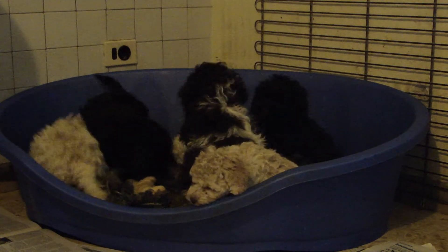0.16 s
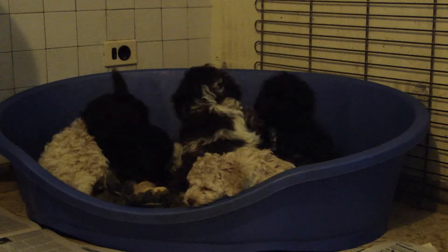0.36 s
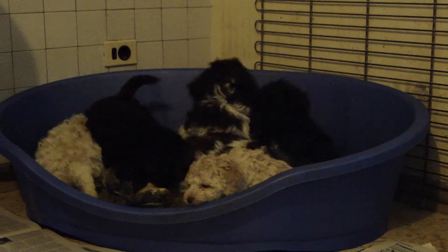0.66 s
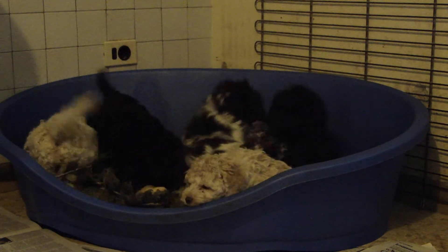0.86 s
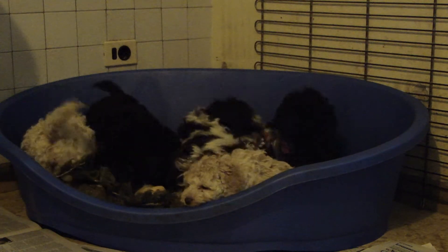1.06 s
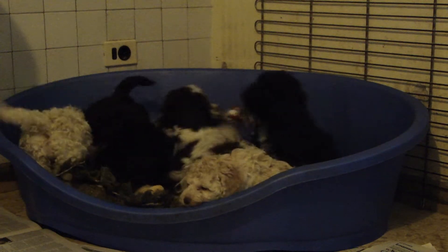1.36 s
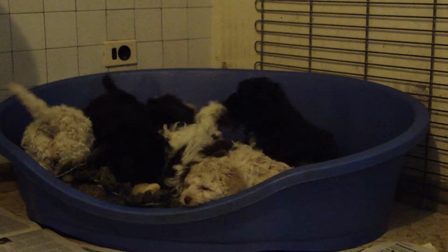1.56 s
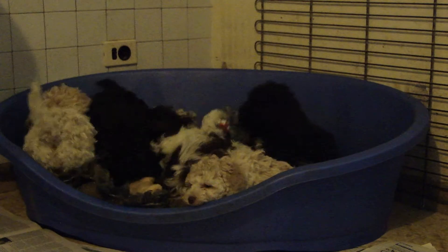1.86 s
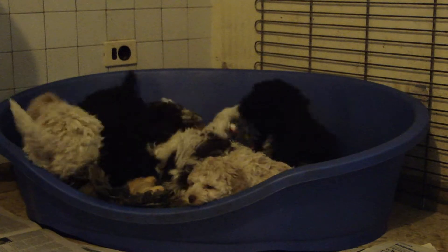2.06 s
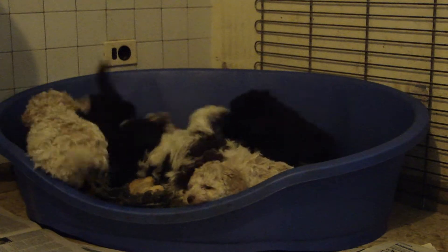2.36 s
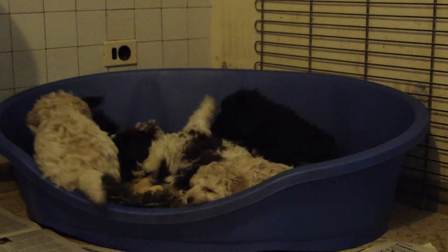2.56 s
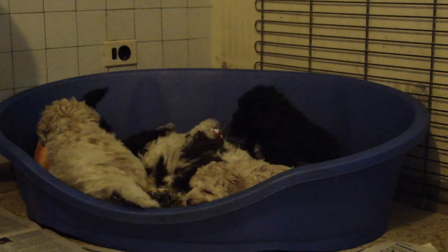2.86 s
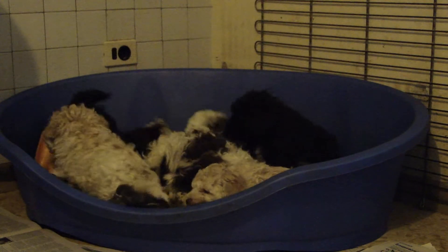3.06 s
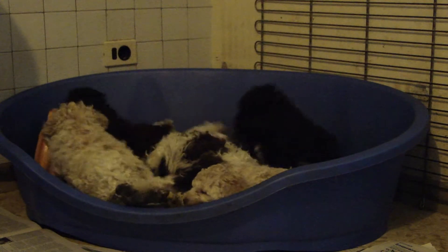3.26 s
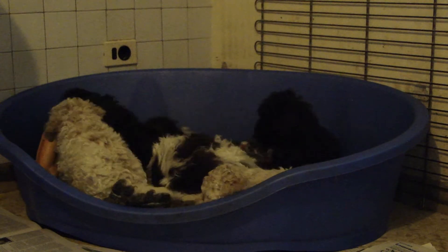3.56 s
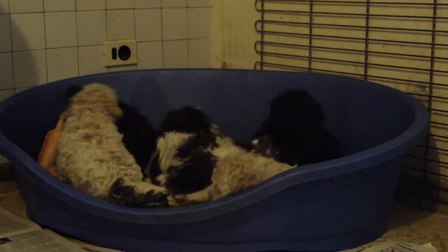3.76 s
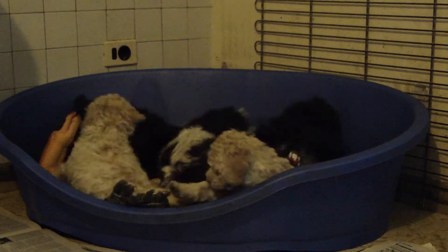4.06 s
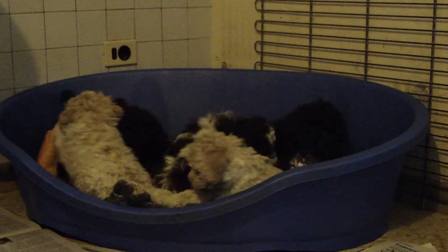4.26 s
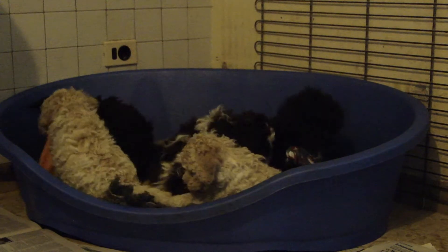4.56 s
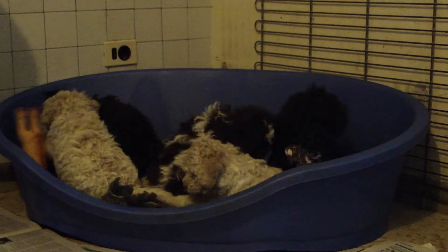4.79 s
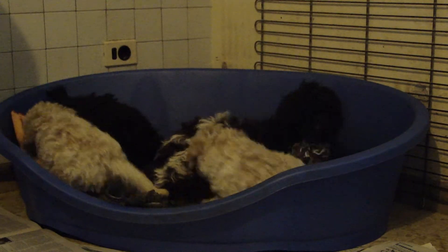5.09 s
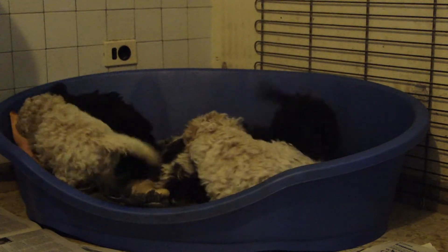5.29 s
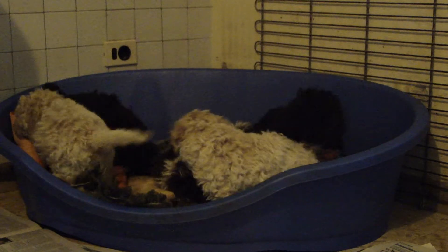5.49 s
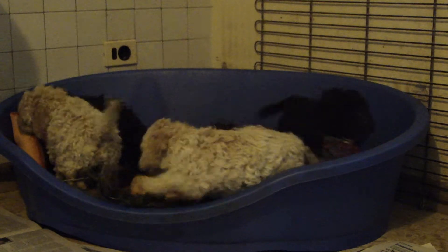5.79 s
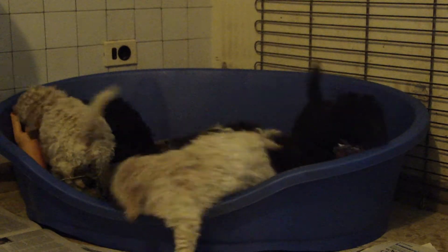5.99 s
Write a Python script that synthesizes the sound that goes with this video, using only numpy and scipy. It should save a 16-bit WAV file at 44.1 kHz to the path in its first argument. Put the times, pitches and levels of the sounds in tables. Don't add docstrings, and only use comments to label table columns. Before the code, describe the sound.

A small tiled room with a faint steady room tone and short reflections, heard closely in stereo, the bed slightly right. From 0 to 2.6 seconds puppies scuffle vigorously in a hollow plastic tub: paws judder on the wall in quick irregular strokes, drumming low, with raking claws, hard knocks, thumps, fur rustles and crisp claw ticks, notably at 0.8 and 1.9. A tiny peep hides at 0.25. Then the scrabbling stops abruptly. A faint rising squeal of a rubber toy at 2.8-3.0, soft shuffles and bumps at 3.1-3.4. A low soft growl swells from 3.5 to 4.0, with a chirping squeak at 3.85. Quiet until small thumps at 4.8; airy squeaks at 5.0, then a sharp knock and steep falling squeak at 5.15-5.28. A last low peep near 5.45, with light bright scuffs, rustles and dull bumps at 5.86 and 5.98 to the end.

```python
import sys
import numpy as np
from scipy import signal
from scipy.fft import rfft, irfft, next_fast_len
from scipy.io import wavfile
from scipy.ndimage import uniform_filter1d

SR = 44100
rng = np.random.default_rng(int(sys.argv[2]) if len(sys.argv) > 2 else 0)


def linear_from_db(decibels):
    return 10 ** (np.asarray(decibels, float) / 20)


def bounce(signal):
    frames = np.transpose(np.atleast_2d(signal))
    limited = np.clip(frames, -1, 1)
    pcm = np.round(limited * 32767).astype(np.int16)
    wavfile.write(sys.argv[1], SR, pcm)


N = 270505

# frequency [Hz], spectrum level [dB per Hz].
SCUFF_SPECTRUM = [(500, -40.5), (800, 1.5), (1300, 1.5), (2200, -1), (3500, -11), (5500, -25),
                  (9000, -57.5)]


def evened(x):
    return x / np.sqrt(np.mean(x ** 2) + 1e-20)


def read(points, hz):
    f, value = np.transpose(points)
    return np.interp(np.log(hz + 1), np.log(f + 1), value)


def colour(x, points):
    size = next_fast_len(x.shape[-1])
    gain = linear_from_db(read(points, np.fft.rfftfreq(size, 1 / SR)))
    return irfft(rfft(x, size) * gain, size)[..., :x.shape[-1]]


def body(x, modes):
    t = np.arange(6000) / SR
    ring = 0
    for k, (hz, width_hz, db) in enumerate(modes):
        decay = width_hz * np.exp(-np.pi * width_hz * t)
        ring = ring + (-1) ** k * linear_from_db(db) * decay * np.sin(2 * np.pi * hz * t)
    return signal.oaconvolve(x, ring)[:len(x)]


def slips(per_s, spread_db):
    hit, size = rng.random(N), rng.exponential(1, N)
    sign = rng.choice([-1., 1.], N)
    clicks = (hit < per_s / SR) * sign * linear_from_db(spread_db * np.minimum(size, 3))
    work = uniform_filter1d(clicks ** 2, size=700) + .1 * np.mean(clicks ** 2)
    return evened(clicks / np.sqrt(work))


def unit(filt, drive):
    return 1 / np.std(filt(drive[:SR]))


def strokes(rows, rise_s, land_db, land_s, sag_db, release_db_per_s):
    out, t = np.zeros((2, N + SR)), np.arange(SR // 3) / SR
    for start, length, db, rel_db in rows:
        shape_db = land_db * np.exp(-t / land_s) + sag_db * np.minimum(t / length, 1)
        shape_db -= release_db_per_s * np.maximum(t - length, 0)
        power = (np.minimum(t / rise_s, 1) * linear_from_db(shape_db)) ** 2
        out[:, round(start * SR):][:, :len(t)] += power * linear_from_db([[db], [db + rel_db]]) ** 2
    return out[:, :N]


def fidget():
    # time [s], drumming level [dB], claw scratch relative to it [dB].
    feet = [
        (0, -39.5, -9),
        (1, -40, -7.5),
        (2.4, -42.5, -12),
        (2.7, -59, 1.5),
        (3.35, -54.5, -4),
        (3.6, -59.5, 0.5),
        (4.5, -60, 1),
        (6.13, -56, 3),
    ]
    s, db, rel_db = np.transpose(feet)
    t = np.arange(N) / SR
    return linear_from_db([np.interp(t, s, db), np.interp(t, s, db + rel_db)]) ** 2


def tub():
    # start [s], length [s], drumming level [dB], claw scratch relative to it [dB].
    digs = [(0, 0.1132, -15, -11), (0.13, 0.0487, -30.5, -4), (0.28, 0.105, -24, -14),
            (0.372, 0.0974, -12.3, -9), (0.47, 0.0444, -28, -10), (0.68, 0.063, -28, -5.5),
            (0.74, 0.059, -39, 6.5), (0.793, 0.081, -16, -8), (0.893, 0.0668, -26, 2.5),
            (0.96, 0.092, -31.9, -5.5), (1.04, 0.112, -25.5, -14.5), (1.15, 0.1213, -17.5, -5),
            (1.26, 0.066, -24, -12.5), (1.355, 0.054, -39.5, -4.5), (1.42, 0.0287, -27.5, -15),
            (1.458, 0.06, -33.5, -7), (1.544, 0.0726, -17.5, -8.5), (1.61, 0.0788, -16.5, -10),
            (1.75, 0.072, -35.5, -12), (1.83, 0.14, -32, -10), (1.98, 0.0386, -12, -9.5),
            (2.03, 0.0764, -20.5, -6), (2.095, 0.0507, -18.5, -13), (2.14, 0.045, -39, -3.5),
            (2.2, 0.039, -29, -15), (2.266, 0.044, -35, -13.5), (2.317, 0.101, -32, -16),
            (2.432, 0.0603, -16.5, -8.5), (2.5, 0.098, -20.5, -8.5), (2.6, 0.1053, -34, -10.5)]
    # start [s], length [s], drumming level [dB], scratch relative to it [dB].
    shuffles = [(2.87, 0.0386, -43, -4), (3.05, 0.083, -41.5, -20), (3.145, 0.063, -33.5, -9),
                (3.21, 0.145, -45.5, -7), (3.372, 0.049, -38, -7), (3.99, 0.048, -47.5, 5),
                (4.07, 0.14, -59.5, 4), (4.545, 0.0337, -48, 5.5), (4.7, 0.116, -47, -2.5),
                (4.828, 0.0675, -29.8, -9), (4.9, 0.126, -44, -2), (5.09, 0.038, -50.5, -7.5),
                (5.155, 0.0935, -38, -3.5), (5.28, 0.064, -41.5, 1.5), (5.35, 0.0777, -54, 17.5),
                (5.42, 0.077, -54, 3.5), (5.516, 0.0505, -48, 17.5), (5.61, 0.0843, -44.5, 8),
                (5.75, 0.091, -44.5, 4), (5.862, 0.135, -38.5, -5.5), (5.985, 0.106, -39.5, -22),
                (6.083, 0.045, -38.5, 6.5)]
    # frequency [Hz], width [Hz], level [dB].
    wall = [(145.3, 8.1, -17), (208.9, 16.45, -7), (250, 24.9, 1), (286.6, 58.1, -2), (341.8, 35.15, 1.5),
            (401.9, 41.7, -1.5), (440.8, 40.4, -2.5), (544.8, 46.2, -0.5), (507.8, 46.4, -4.5),
            (600.2, 14.2, -2.5), (623, 65.4, -11.5), (682.8, 61.2, -7)]
    # frequency [Hz], width [Hz], level [dB].
    rim = [(739.2, 93, -1.5), (862.3, 51, -1.5), (990, 27, -9), (945.6, 77.6, -5.5), (1106, 165, -5),
           (1248, 64.7, -4), (1481.8, 63.3, -10), (1596, 64, -11), (1765.5, 265, -14), (2054, 194, -13.5),
           (2600, 640, -23.5)]
    # frequency [Hz], level [dB per Hz].
    scratch_spectrum = [(350, -32.5), (600, 9), (910, -20), (1000, -7.5), (1360, -14), (2400, -28),
                        (5000, -39), (6500, -73), (11000, -120)]

    def low(x):
        return body(x, wall)

    def high(x):
        return body(x, rim) + linear_from_db(38.0) * colour(x, scratch_spectrum)

    def thin(x):
        return colour(x, SCUFF_SPECTRUM)

    power = strokes(digs, rise_s=0.02, land_db=1, land_s=.02, sag_db=-7, release_db_per_s=600)
    power = power + strokes(shuffles, rise_s=.004, land_db=3, land_s=0.0466, sag_db=-6.5, release_db_per_s=399.5)
    drum, scratch = np.sqrt(power + fidget())
    pad, claws = slips(750, 3.5), slips(2500, 4.)
    light = scratch ** 2 / (scratch ** 2 + 1.95 * drum ** 2 + 1e-20)
    drummed = linear_from_db(-4) * unit(low, pad) * low(pad * drum)
    raked = linear_from_db(-1.64) * unit(high, claws) * high(claws * scratch * np.sqrt(1 - 0.87 * light))
    scuffed = linear_from_db(-0.5) * unit(thin, claws) * thin(claws * scratch * np.sqrt(light))
    return drummed + raked + scuffed


def jolts():
    # time [s], peak [dB], pitch [Hz].
    jerks = [(0.007, -15, 553), (0.028, -17, 350), (0.058, -16, 538.6), (0.088, -17, 290),
             (0.117, -22.0, 373.5), (0.143, -24.5, 279), (0.282, -27, 268), (0.304, -25.5, 268.5),
             (0.32, -29, 288), (0.34, -28, 382), (0.394, -14, 290.6), (0.415, -12, 303.4),
             (0.447, -14.5, 273), (0.483, -21.5, 318), (0.503, -20, 283), (0.694, -22, 277),
             (0.814, -15.5, 593), (0.835, -13, 297.3), (0.862, -18.0, 275), (0.901, -10.5, 280.5),
             (0.933, -21.5, 305), (0.968, -25, 262), (1.062, -22.5, 353.6), (1.181, -16.5, 259),
             (1.204, -13, 287), (1.247, -15, 297), (1.285, -21.5, 300.5), (1.304, -27.5, 283),
             (1.368, -28, 257.4), (1.56, -15, 663.5), (1.599, -17.5, 271), (1.637, -14, 289),
             (1.691, -23, 270), (1.922, -24.5, 564), (2.011, -13.5, 318), (2.026, -23.5, 317),
             (2.049, -18, 296.6), (2.082, -20, 373), (2.1, -20, 562.5), (2.113, -16, 290),
             (2.153, -26.5, 469), (2.172, -27, 274), (2.326, -27, 280), (2.455, -14.5, 279.7),
             (2.505, -17.5, 322.4), (2.519, -21, 357.6), (2.535, -20, 305), (2.565, -19, 262.5),
             (4.83, -27.5, 493.5), (4.852, -27, 575.6), (4.896, -34.5, 511), (4.926, -34.5, 499),
             (5.158, -21, 831), (5.199, -31.5, 505), (5.311, -35.5, 525.5), (5.531, -34, 1567),
             (5.551, -32.5, 805.5), (5.867, -29, 369), (5.991, -43.5, 332), (6.094, -31.5, 601)]
    lead_s, rise_s, t60_s = 0.005989, 0.00195, 0.0505
    out, t = np.zeros(N + 3000), np.arange(3000) / SR
    grit = evened(colour(rng.standard_normal(N + 3000), SCUFF_SPECTRUM))
    for (s, db, hz), near in zip(jerks, rng.random((len(jerks), 3))):
        at = round((s - lead_s) * SR)
        fade = linear_from_db(db + 4 - 60 * t / t60_s) * (1 - np.exp(-t / rise_s)) ** 2
        upper = sum(np.sin(2 * np.pi * (330 + 420 * k) * t) for k in near)
        swing = -np.sin(2 * np.pi * hz * t) - linear_from_db(-9.5) * upper + linear_from_db(-15) * grit[at:at + 3000]
        out[at:at + 3000] += fade * swing
    return out[:N]


def raps():
    # time [s], peak [dB], pitch [Hz].
    knocks = [(0.015, -20.5, 721), (0.032, -20, 714), (0.291, -35, 687), (0.356, -25, 616),
              (0.37, -19, 759), (0.386, -15, 1001), (0.419, -16, 675), (0.454, -21, 677), (0.478, -24, 708),
              (0.686, -27.5, 713), (0.736, -26, 1337), (0.801, -14.5, 690), (0.819, -16, 997),
              (0.897, -18.5, 789), (0.913, -23.5, 674), (0.957, -23.5, 1478), (1.056, -22, 694),
              (1.11, -32, 695), (1.151, -17.5, 727), (1.165, -18.5, 620), (1.184, -11.5, 675),
              (1.207, -11, 643), (1.229, -19, 857), (1.289, -25.5, 660), (1.359, -34.5, 689),
              (1.439, -35, 798), (1.458, -29.5, 680), (1.551, -18, 695), (1.574, -16.5, 653),
              (1.602, -16.5, 703), (1.625, -16, 737), (1.919, -26.5, 624), (1.984, -23.5, 744),
              (1.992, -14.5, 642), (2.053, -21, 693), (2.267, -39, 686), (2.318, -34, 689),
              (2.439, -19, 663), (2.454, -16.5, 656), (2.49, -22, 990), (2.509, -17.5, 667),
              (3.146, -32, 990), (3.37, -35, 1194), (3.996, -34.5, 1731), (5.16, -20, 809.5),
              (5.343, -27, 1317), (5.524, -25.5, 1566)]
    t60_s, rise_s = 0.0388, 0.00066
    out, t = np.zeros(N + 2000), np.arange(2000) / SR
    for (s, db, hz), near in zip(knocks, rng.random((len(knocks), 2))):
        neighbours = sum(np.sin(2 * np.pi * hz * (0.7983 + 1.098 * k) * t) for k in near)
        ring = np.sin(2 * np.pi * hz * t) + 0.646 * neighbours
        fade = linear_from_db(db - 5.5 - 60 * t / t60_s) * (1 - np.exp(-t / rise_s))
        out[round(s * SR):][:2000] += fade * ring
    return out[:N]


def thumps():
    # time [s], peak [dB], pitch [Hz], ring t60 [s], low tub boom [dB].
    landings = [(0.884, -17, 276.5, 0.061, -50.5), (1.05, -21.5, 624.4, 0.063, -49),
                (1.361, -30, 257, 0.075, -51), (1.461, -25.5, 489, 0.055, -43.5),
                (1.546, -13.5, 726.4, 0.051, -39), (1.982, -13, 560, 0.041, -47),
                (2.266, -25, 517, 0.054, -50), (2.317, -25.5, 261.5, 0.134, -53),
                (3.055, -31, 250, 0.093, -52), (3.148, -29.5, 394, 0.052, -42.5),
                (3.375, -28.5, 507, 0.0283, -43.5), (4.078, -37, 481, 0.104, -69.5),
                (4.2, -35, 225, 0.062, -43.5), (4.828, -26, 380, 0.045, -39),
                (5.151, -16, 557.7, 0.0303, -62), (5.174, -21.5, 801, 0.0304, -61.5),
                (5.188, -21.5, 702, 0.034, -62.5), (5.862, -22.5, 250, 0.0514, -39),
                (5.985, -22, 218.8, 0.061, -38)]
    out, t = np.zeros(N + 9000), np.arange(9000) / SR
    for (s, db, hz, t60_s, boom_db), near in zip(landings, rng.random((len(landings), 3))):
        neighbours = sum(np.sin(2 * np.pi * hz * (0.6993 + 0.936 * k) * t) for k in near)
        swing = np.sin(2 * np.pi * hz * t) + 0.458 * neighbours
        swing *= linear_from_db(db - 2.5 - 60 * t / np.clip(t60_s, .02, .3)) * (1 - np.exp(-1.5 * hz * t))
        boom_hz = 125 + 45 * near[0]
        boom = linear_from_db(boom_db + 5 - 60 * t / 0.1445) * (1 - np.exp(-t / 0.0082)) * np.sin(2 * np.pi * boom_hz * t)
        out[round(s * SR):][:9000] += swing + boom
    return out[:N]


def ticks():
    # time [s], peak [dB], pitch [Hz].
    taps = [(0.6883, -22, 3590), (0.7966, -8, 2880), (0.8404, -16, 2800), (0.8982, -15, 1800),
            (0.933, -14, 3400), (1.189, -25, 2800), (1.2515, -25.5, 3300), (1.6221, -25, 2800),
            (1.9075, -14, 2560), (2.0646, -28.5, 2510), (2.5635, -22.5, 4090), (3.8875, -24.5, 6360),
            (4.2, -33.5, 3500), (4.549, -30, 1500), (4.8899, -21.5, 2930), (4.8994, -19.5, 5000),
            (5.2126, -22, 11460), (5.5243, -22, 3190), (5.6174, -22, 2600), (5.754, -23.5, 4030),
            (5.8737, -18, 3050)]
    out, t = np.zeros(N + 500), np.arange(500) / SR
    for s, db, hz in taps:
        out[round(s * SR):][:500] += linear_from_db(db - 2.5) * np.exp(-t / 3e-4) * np.cos(2 * np.pi * hz * t)
    return out[:N]


def swells(rows):
    out = np.zeros((2, N + SR))
    for start, length, db, rel_db in rows:
        arch = np.sin(np.pi * np.arange(0, 1, 1 / (length * SR)))
        out[:, round(start * SR):][:, :len(arch)] += (arch * linear_from_db([[db], [db + rel_db]])) ** 2
    return out[:, :N]


def rustle():
    # start [s], length [s], level [dB], finest hiss relative to it [dB].
    snaps = [(0, 0.0605, -38.5, -15.5), (0.378, 0.059, -42, -13), (0.685, 0.086, -43, -17.5),
             (0.785, 0.0897, -38, -14), (0.894, 0.086, -43, -29), (1.546, 0.137, -50.5, -10.5),
             (1.899, 0.07, -42.5, -8.5), (2.055, 0.06, -52.5, -9.5), (2.44, 0.0515, -43, -9),
             (2.555, 0.0199, -43, -1.8), (3.14, 0.032, -58.5, 0.62), (3.367, 0.0456, -43.5, -4.5),
             (4.545, 0.015, -60.5, -2.5), (4.826, 0.023, -50, -3), (4.888, 0.071, -43.5, -7),
             (5.095, 0.036, -53.5, -4.5), (5.145, 0.019, -55.5, -3), (5.203, 0.0125, -53, 6),
             (5.515, 0.108, -53, -12), (5.745, 0.0915, -44.5, 0.14), (5.865, 0.0994, -45.5, -8.5),
             (6.083, 0.0445, -49.5, -11.5)]
    # start [s], length [s], level [dB], finest hiss relative to it [dB].
    brushes = [(0.05, 0.2187, -45.5, -12), (0.24, 0.166, -49.5, -12), (0.4, 0.138, -47.5, -1.03),
               (0.5, 0.22, -49.5, -15.0), (0.72, 0.105, -43, -18), (0.94, 0.243, -52.5, -13),
               (1.17, 0.133, -52, -13), (3.07, 0.131, -61.5, -5.5), (3.19, 0.077, -50.5, -5),
               (3.83, 0.14, -54, -12.5), (3.96, 0.093, -57, -11), (5.135, 0.087, -53, -6),
               (5.75, 0.0913, -45.5, -1), (4.18, 0.045, -59, -13), (4.72, 0.129, -57, -10.5),
               (5.03, 0.076, -60.5, -6.5), (5.22, 0.142, -57.5, -8.5), (5.31, 0.13, -46, -13.5)]
    # frequency [Hz], level [dB per Hz].
    fur = [(880, -39), (1500, 0), (2700, -1.5), (3200, -2), (4380, -5), (8000, -13.5), (10400, -35),
           (17600, -120)]
    # frequency [Hz], level [dB per Hz].
    hiss = [(3530, -20), (6000, -5.5), (10700, -3), (11600, -4.5), (13100, -29.5), (13700, -40),
            (13800, -50.5)]
    per_fidget_db = np.array([[-24.5], [-24.5 - 8.5]])
    stir = fidget()[0] * linear_from_db(per_fidget_db) ** 2
    snapped = strokes(snaps, rise_s=0.009, land_db=5.5, land_s=0.0924, sag_db=-8, release_db_per_s=379.5)
    coarse, fine = np.sqrt(snapped + swells(brushes) + stir)
    coarse_part = linear_from_db(6.0) * coarse * evened(colour(slips(6000, 4.36), fur))
    fine_part = linear_from_db(7.5) * fine * evened(colour(slips(6500, 2.1), hiss))
    return coarse_part + fine_part


def smooth_noise(n, size):
    return evened(uniform_filter1d(rng.standard_normal(n), size=size))


def squeak(rows, airy, depth, top_db):
    lead_s, flutter_hz = .006, 1772.6
    wakes_hz, full_hz = 3980, 4420
    s, *columns = np.transpose(rows)
    t = np.arange(N) / SR + lead_s
    on = (t >= s[0]) & (t < s[-1])
    hz, db = (np.interp(t[on], s, c) for c in columns)
    n = len(hz)
    flutter = depth * np.clip((hz - wakes_hz) / (full_hz - wakes_hz), .1, 1)
    octave_db = top_db - 10 * np.maximum(3600 - hz, 0) / 1000
    airy = airy * (1 - 0.54 * flutter)
    shake, drift, patch = (smooth_noise(n, size) for size in (40, 60, 220))
    leak = linear_from_db(-1) * airy * smooth_noise(n, 24)
    turn = 2 * np.pi * np.cumsum(hz * (1 + 0.0945 * airy * shake)) / SR
    beat = np.cos(2 * np.pi * np.cumsum(flutter_hz * (1 + 0.1055 * airy * drift)) / SR)
    whistle = (1 + 2.09 * flutter * beat + leak) * np.cos(turn)
    octave = linear_from_db(octave_db) * (1 + 1.98 * flutter * beat) * np.cos(2 * turn)
    out = np.zeros(N)
    out[on] = linear_from_db(db + 4.5 * patch) * (whistle + octave) * signal.windows.tukey(n, .15)
    return out


def toy():
    # time [s], whistle pitch [Hz], level [dB].
    squeezes = [
        [(.21, 2600, -61.5), (.25, 2740, -49), (.31, 2643, -65)],
        [(2.79, 2223, -68.5), (2.83, 2901, -63), (2.855, 3600, -59.5), (2.89, 3950, -62), (2.915, 4412, -61.5),
         (2.95, 4420, -60), (2.99, 4420, -64.5), (3.02, 3520, -59.5)],
        [(3.825, 3308, -61.5), (3.845, 3800, -56), (3.865, 4244, -51), (3.885, 4533, -54), (3.915, 4598, -54.5),
         (3.935, 4560, -63), (3.97, 4450, -64)],
        [(3.98, 3555, -51.5), (4.0, 3466, -65), (4.04, 3110, -63.5)],
        [(4.995, 2397, -63), (5.03, 2875, -51.5), (5.065, 3287, -52.5), (5.12, 2997, -52), (5.15, 2830, -58)],
        [(5.138, 3903, -59.5), (5.152, 5100, -47), (5.176, 4953, -43.5), (5.19, 4448, -43.5),
         (5.198, 4000, -45.5), (5.225, 3600, -47), (5.25, 3242, -49), (5.285, 2708, -64.5)],
        [(5.146, 5492, -52.5), (5.16, 6014, -41.5), (5.175, 6152, -46.5), (5.192, 5920, -55.5)],
        [(5.435, 2680, -57.5), (5.47, 2616, -56), (5.515, 2570, -61)],
    ]
    # airiness [0-1], flutter depth [0-1], octave level [dB].
    reeds = [
        (0.6, 0, -19.5),
        (.5, 1, -2),
        (0.88, 0.94, -6),
        (.85, .1, 0.5),
        (.45, 0.02, -14.5),
        (0.69, .3, -8.5),
        (.6, 0.49, -25),
        (.55, 0.08, -22),
    ]
    # frequency [Hz], gain [dB].
    shell = [(2000, 7), (2800, 8.5), (3500, 7), (4500, 5), (5500, 10), (6500, 11.5), (9000, 5.5),
             (10500, -12), (13000, -36)]
    return colour(sum(squeak(rows, *reed) for rows, reed in zip(squeezes, reeds)), shell)


def growl():
    # time [s], pitch [Hz], level [dB].
    voice = [
        (3.48, 96, -62.5),
        (3.6, 92.8, -56),
        (3.8, 89.4, -52),
        (3.92, 96.1, -51),
        (4.03, 97.3, -62),
    ]
    # frequency [Hz], width [Hz], level [dB].
    throat = [(186, 175, -6), (531, 168, -3), (1106, 200, -14)]
    s, hz, db = np.transpose(voice)
    t = np.arange(N) / SR
    uneven = 1 + 0.618 * uniform_filter1d(rng.standard_normal(N), size=400)
    turn = 2 * np.pi * np.cumsum(np.interp(t, s, hz) * uneven) / SR
    pulses = sum(np.cos(k * turn) for k in range(2, 14))
    return linear_from_db(np.interp(t, s, db, left=-120, right=-120)) * evened(body(pulses, throat))


def port_pair(a, b):
    gap_m, sound_m_per_s = .1, 343
    size = next_fast_len(len(a))
    same = np.sinc(2 * np.fft.rfftfreq(size, 1 / SR) * gap_m / sound_m_per_s)
    mixed = same * rfft(a, size) + np.sqrt(1 - same ** 2) * rfft(b, size)
    return np.array([a, irfft(mixed, size)[:len(a)]])


def room(x):
    # frequency [Hz], t60 [s].
    reverb = [(200, 0.0937), (1000, 0.093), (4000, 0.1115), (12000, 0.122)]
    hz, t, z = signal.stft(rng.standard_normal((3, 2, SR // 2)), SR, nperseg=256)
    tails = signal.istft(z * linear_from_db(-60 * t / read(reverb, hz)[:, None]), SR, nperseg=256)[1]
    shift, out = 2 * np.pi * 5 * np.arange(N) / SR, 0
    for k, tail in enumerate(tails):
        pair = port_pair(*np.pad(tail / np.linalg.norm(tail[0]), ((0, 0), (90, 130))))
        turn = np.sqrt(2 / 3) * np.cos(shift + k * np.pi / 3)
        out = out + signal.fftconvolve((x * turn)[None], pair, axes=1)[:, :N]
    return out


def floor():
    # frequency [Hz], level [dB per Hz].
    tone_spectrum = [(15, -96), (25, -66), (91, -33), (151, -28), (181, -12), (230, -15.5), (483, -5),
                     (522, -6.5), (566, -5.5), (717, -10), (1860, -11), (10400, -27.5), (13800, -40)]
    # frequency [Hz], level [dB per Hz].
    rumble_spectrum = [(20, -8), (45, 0.5), (70, 5), (110, 3.5), (200, -10), (400, -89)]
    drift_db = .5 * smooth_noise(N, 5000)
    tone = evened(colour(port_pair(*rng.standard_normal((2, N))), tone_spectrum))
    rumble = evened(colour(rng.standard_normal((2, N)), rumble_spectrum))
    return linear_from_db(-50 + drift_db) * tone + linear_from_db(-56.0) * rumble


def scene():
    left_lag_s, direct_db, room_db, ports_db = 6e-5, -4.5, -2.8, [[-.7], [.7]]
    bed = tub() + jolts() + raps() + thumps() + ticks() + rustle() + toy() + growl()
    late = np.roll(bed, round(left_lag_s * SR))
    heard = linear_from_db(direct_db) * np.array([late, bed]) + linear_from_db(room_db) * room(bed)
    return linear_from_db(ports_db) * (heard + floor())


def low_pass(x):
    return signal.sosfilt(signal.butter(12, 14000, fs=SR, output="sos"), x)


def record(dry):
    cut = signal.sosfilt(signal.butter(4, 156, "high", fs=SR, output="sos"), dry)
    bent = signal.detrend(cut - 0.0223 * cut ** 2, type="constant")
    return low_pass(bent)


dry = scene()
out = record(dry)
bounce(out)
```